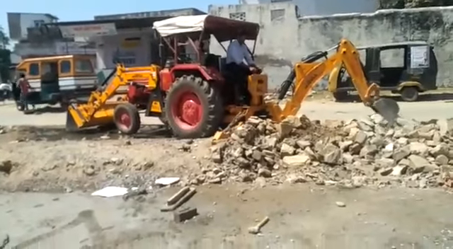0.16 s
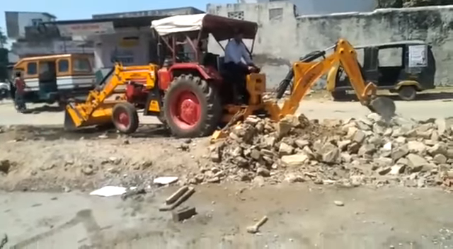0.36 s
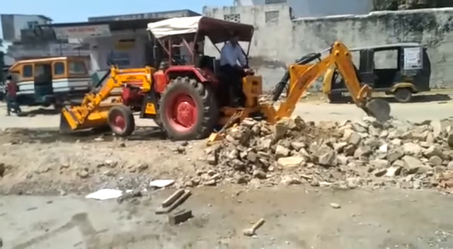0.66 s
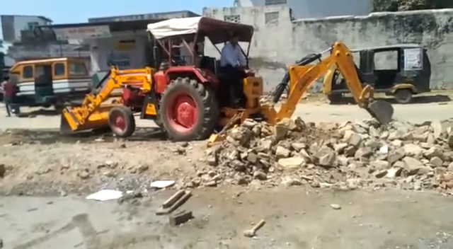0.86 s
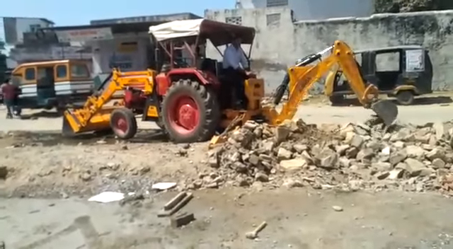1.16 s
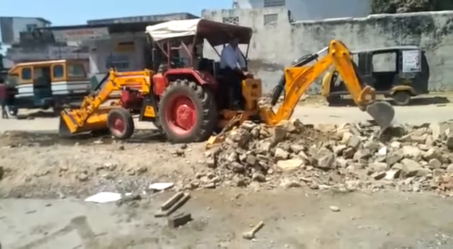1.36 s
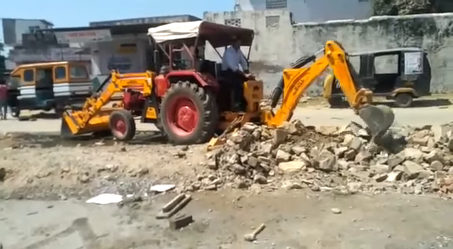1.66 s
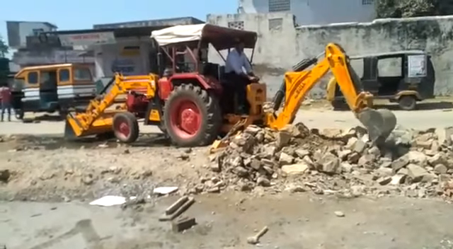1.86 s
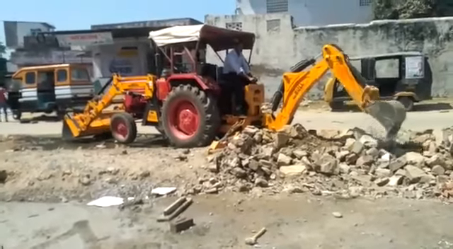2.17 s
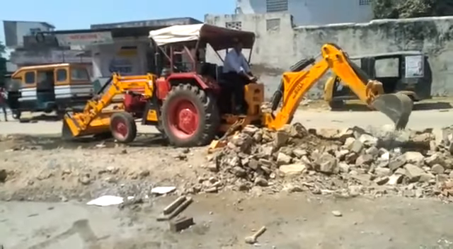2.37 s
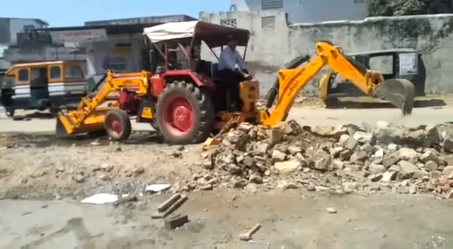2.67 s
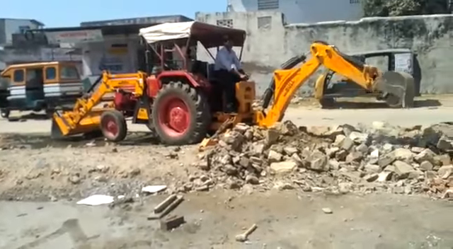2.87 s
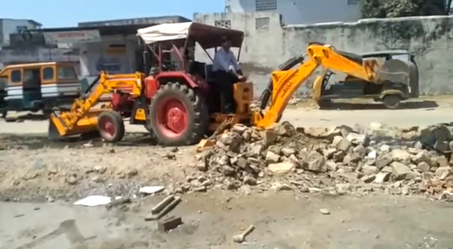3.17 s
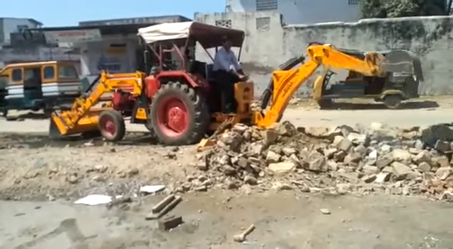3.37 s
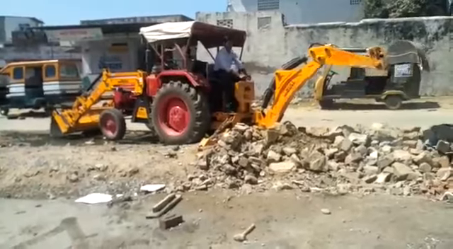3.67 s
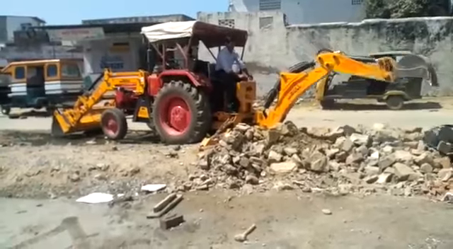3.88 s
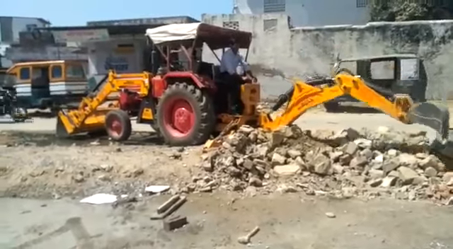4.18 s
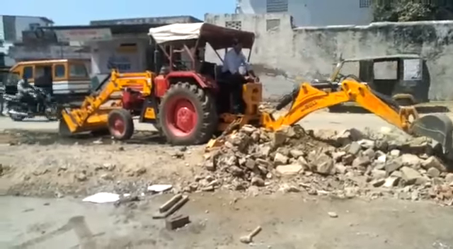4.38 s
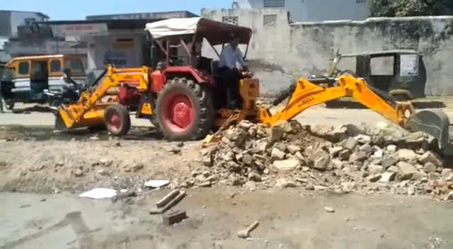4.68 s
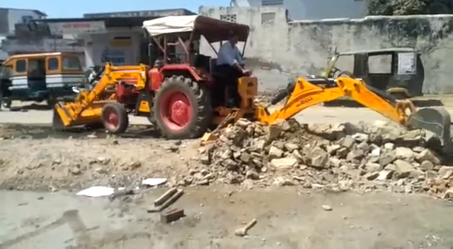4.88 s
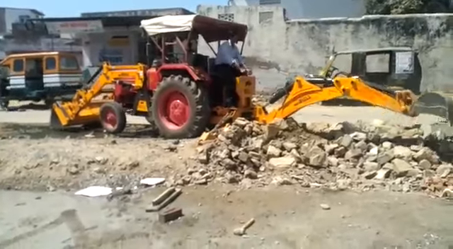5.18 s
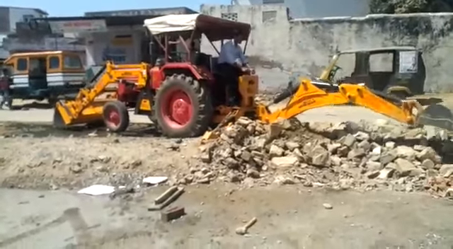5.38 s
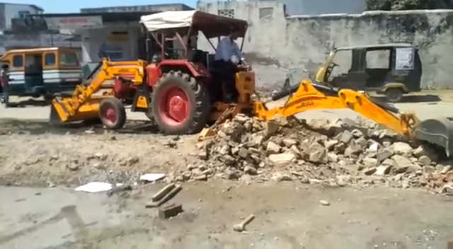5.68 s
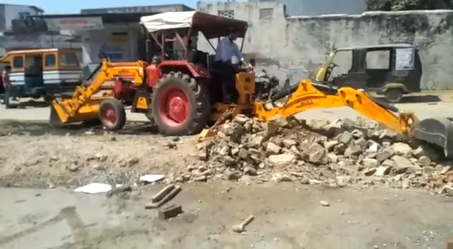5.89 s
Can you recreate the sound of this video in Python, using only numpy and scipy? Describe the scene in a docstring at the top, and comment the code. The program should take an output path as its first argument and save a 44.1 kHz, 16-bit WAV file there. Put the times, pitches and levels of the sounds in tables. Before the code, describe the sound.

Steady diesel clatter, with sharp stone cracks and metallic bucket clanks, a brief high valve hiss, then a last crumble of dry rubble.

```python
"""A diesel tractor runs at a nearly steady speed while its backhoe bucket works broken brick and stone.
First come a few bumps and light cracks, then harder blows near 2 s, a short valve hiss at 3.6 s,
the hardest crack at 4.4 s and a last crumbling run before 6 s. Engine: sine tones and pulsing noise.
Stones: bursts of grainy noise with wobbling notes for the lumps. Bucket: resonances struck by the blows.
Hard blows make the gain control turn everything down, so the engine drops away and slowly swells back."""
import sys
import numpy as np
from scipy import signal
from scipy.fft import rfft, irfft, next_fast_len
from scipy.io import wavfile

SR = 44100
rng = np.random.default_rng(int(sys.argv[2]) if len(sys.argv) > 2 else 0)


def output_pcm(signal):
    """Save a mono or channel-first signal as 16-bit PCM at the path in sys.argv[1].

    Samples are clipped to [-1, 1] before scaling.
    """
    pcm = np.clip(np.atleast_2d(signal).T, -1, 1) * 32767
    wavfile.write(sys.argv[1], SR, np.round(pcm).astype(np.int16))


N = 266805
TIME = np.arange(N) / SR


def from_db(db):
    """Turn decibels into a gain."""
    return 10 ** (np.asarray(db) / 20)


def rms_one(x):
    """Scale a sound to an rms (average strength) of 1."""
    return x / np.sqrt(np.mean(x ** 2) + 1e-20)


def in_time(rows):
    """Read a (time [s], value) curve at every sample."""
    times, values = np.transpose(rows)
    return np.interp(TIME, times, values)


def at_hz(points, hz):
    """Read a (frequency [Hz], value) curve on a log-frequency axis."""
    frequencies, values = np.transpose(points)
    return np.interp(np.log(hz), np.log(frequencies), values)


def coloured(x, spectrum):
    """Filter a sound by a (frequency [Hz], level [dB]) curve and scale it to rms 1."""
    size = next_fast_len(len(x))
    frequencies = np.fft.rfftfreq(size, 1 / SR) + 1   # the 1 avoids log(0)
    gain = from_db(at_hz(spectrum, frequencies))
    return rms_one(irfft(rfft(x, size) * gain, size)[:len(x)])


def drift(rate, size=N):
    """Smooth random wandering of rms 1, with `rate` new values per second."""
    knots = rng.standard_normal(int(size / SR * rate) + 3)
    position = np.arange(size) / SR * rate
    return rms_one(np.interp(position, np.arange(len(knots)), knots))


def resonate(x, hz, width_hz):
    """Ring at one frequency: a two-pole resonance with gain 1 at its peak."""
    r = np.exp(-np.pi * width_hz / SR)
    feedforward = np.array([1, 0, -1]) * (1 - r * r) / 2
    feedback = [1, -2 * r * np.cos(2 * np.pi * hz / SR), r * r]
    return signal.lfilter(feedforward, feedback, x + 1e-18)


def swell_and_die(t, rise, t60):
    """Loudness of a blow: it rises over `rise` seconds and decays by 60 dB in `t60` seconds."""
    return (1 - np.exp(-t / rise)) * np.exp(-np.log(1000) * t / t60)


def add(out, start_s, sound):
    """Mix a sound in at a given time."""
    at = round(start_s * SR)
    out[at:at + len(sound)] += sound[:N - at]


def cylinder_knock(crank, rise=0.00059, t60=0.099):
    """Four cylinders fire in turn, each with a noisy knock of its own that repeats every cycle."""
    half_turns = np.floor(crank / np.pi).astype(int)
    firings = np.flatnonzero(np.diff(half_turns)) + 1
    t, out = TIME[:SR // 12], np.zeros(N)
    for cylinder in range(4):
        own = firings[cylinder::4]
        clicks = np.zeros(N)
        clicks[own] = from_db(2 * rng.standard_normal(len(own)))   # uneven strength
        knock = rng.standard_normal(len(t)) * swell_and_die(t, rise, t60)
        out += signal.oaconvolve(clicks, knock)[:N]
    return rms_one(out)


def exhaust(crank, waver_db=1.0, slip=0.12):
    """The exhaust hums at multiples of the crank rate; each tone wavers in strength and timing."""
    # exhaust note: (multiple of the crank rate, relative level [dB])
    exhaust_orders = [(1, -34), (2, -10.5), (3, -31), (4, 0.5), (5, -12.5), (6, -9), (7, -15), (8, -11.5),
                      (9, -23.5), (10, -14), (11, -26), (12, -17)]
    hum = np.zeros(N)
    for k, db in exhaust_orders:
        phase = k * crank + rng.uniform(0, 2 * np.pi) + slip * np.sqrt(k) * drift(22)
        hum += from_db(db + waver_db * drift(20)) * np.sin(phase)
    return rms_one(hum)


def clatter(crank):
    """Cylinder knock over the even rush of fan and gears gives a broad clatter."""
    # clatter spectrum: (frequency [Hz], relative level per Hz [dB])
    clatter_spectrum = [(30, -22), (45, -4), (65, 2.5), (120, -3), (200, -0.5), (310, -0.5), (550, -14.5),
                        (760, -5), (1150, -13), (2000, -14), (4000, -17.5), (9500, -26.5), (12000, -20),
                        (15500, -24)]
    shake = 0.6 * cylinder_knock(crank) + rng.standard_normal(N)
    return coloured(shake, clatter_spectrum)


def block_ringing(crank, panel_db=3.0):
    """Knock and rush set the engine block and panels ringing, with a wandering strength."""
    # ringing of block and panels: (frequency [Hz], width [Hz], relative level [dB])
    block_modes = [(818.5, 21, -5), (959, 77, 1), (1415, 250, 0.5), (2230, 200, -4.5), (3090, 260, -4.5)]
    shake = cylinder_knock(crank) + rng.standard_normal(N)
    ringing = np.zeros(N)
    for hz, width_hz, db in block_modes:
        ringing += from_db(db + panel_db * drift(20)) * rms_one(resonate(shake, hz, width_hz))
    return rms_one(ringing)


def engine(exhaust_db=-37.5, clatter_db=-38.5, block_db=-4):
    """Two firings a turn drive low exhaust tones, a pulsing clatter and the ringing block."""
    # governed engine speed: (time [s], crank turns per second [1/s])
    speed = [(0, 24.8), (.85, 24.9), (1.15, 24.55), (1.9, 24.9), (2.4, 24.65), (3.05, 24.95), (3.5, 24.6),
             (4.3, 24.75), (6.05, 24.7)]
    # level of the engine over time: (time [s], level [dB])
    engine_level = [(0, -1.5), (0.55, -0.4), (0.88, -2.5), (1.15, 3.5), (3.0, 4.5), (4.35, 5.5), (5.45, 5),
                    (6.05, 0)]
    crank = 2 * np.pi * np.cumsum(in_time(speed)) / SR
    mechanical = clatter(crank) + from_db(block_db) * block_ringing(crank)   # block level is against the clatter
    running = from_db(exhaust_db) * exhaust(crank) + from_db(clatter_db) * mechanical
    return from_db(in_time(engine_level)) * running


def valve(opens_s=3.554, start_db=-14.5, fall_db_per_s=100, flutter_db=1.5):
    """A short, very high hiss as the boom changes direction: the valve opens, the pressure falls, it shuts."""
    # oil squeezing through the valve: (frequency [Hz], relative level per Hz [dB])
    hiss_spectrum = [(1000, -16), (1500, -4.5), (2100, -3), (2700, -18.5), (5500, -19), (9000, -22.5),
                     (11700, -16), (12300, 3), (14000, 0.5), (15500, -7.5)]
    attack_s, hold_s, release_s = 0.023, 0.12, 0.047
    t = TIME - opens_s
    opening = np.interp(t, np.cumsum([0, attack_s, hold_s, release_s]), [0, 1, 1, 0])
    level_db = start_db - fall_db_per_s * np.maximum(t - attack_s, 0)
    hiss = coloured(rng.standard_normal(N), hiss_spectrum)
    return opening * from_db(level_db + flutter_db * drift(100)) * hiss


def yard(x, wet_db=-23, rise=0.054, t60=0.31):
    """Walls and the heap scatter the sound into a short, thin tail."""
    # tail of the yard: (frequency [Hz], relative level [dB])
    tail_spectrum = [(100, 8), (600, 5), (2000, 0.5), (4300, -2), (5700, 6), (8000, 5), (13000, -10)]
    t = TIME[:SR]
    tail = coloured(rng.standard_normal(len(t)), tail_spectrum) * swell_and_die(t, rise, t60)
    return x + from_db(wet_db) * signal.fftconvolve(x, tail / np.linalg.norm(tail))[:N]


def bumps(push_s=0.00153):
    """The bucket bumps the heap: each force is one smooth push, soft enough to stir mainly low notes."""
    # bumps against the heap: (time [s], level of the push [dB])
    bump_table = [(0.378, 4.5), (1.031, 10.5), (1.147, 13), (1.214, 27), (1.272, 20), (1.634, 10)]
    out, t = np.zeros(N), TIME[:SR // 100]
    push = np.sin(np.pi * np.minimum(t / push_s, 1)) ** 2
    for start_s, db in bump_table:
        add(out, start_s, from_db(db) * push)
    return out


def bucket(force, ring_db=-3, chatter_db=3.0, chatter_s=0.00015):
    """Blows set the steel ringing; the rubble damps it and makes it chatter in strength and timing."""
    # notes of the steel bucket: (frequency [Hz], relative level [dB], time to decay by 60 dB [s])
    steel_modes = [(612, -4.5, 0.29), (773, -14, 0.091), (1098, -20.5, 0.29), (1650, -7, 0.071),
                   (2140, -8, 0.13), (2257, 7, 0.11), (2886, 4, 0.11), (3065, -4, 0.038), (3960, -6, 0.081),
                   (5157, -29.5, 0.19), (8576, -24, 0.09), (9986, -21, 0.15)]
    ring = np.zeros(N)
    for hz, db, t60 in steel_modes:
        width_hz = np.log(1000) / (np.pi * t60)   # a quick decay means a wide resonance
        ring += from_db(db) * resonate(force, hz, width_hz)
    level = from_db(ring_db + chatter_db * drift(89.95))
    return level * np.interp(TIME + chatter_s * drift(110), TIME, ring)


def contacts():
    """List every touch of the bucket on stone, hard or quiet, with the same eight columns."""
    # the bucket breaks a stone and knocks a lump loose: (time [s], level [dB], rise [s],
    # crumbling time to decay by 60 dB [s], weight in the low mids [dB], dust in the treble [dB],
    # note of the lump [Hz], level of the note against the blow [dB])
    blow_table = [ (0.930, -18, 0.0054, 0.19, -1.5, -3, 768, 4.5), (0.946, -25.5, .003, .19, 4, 8, 901, 15),
                  (0.999, -31, .004, 0.22, 16, 4, 596, 12.5),
                  (1.203, -9.5, 0.0084, 0.11, 13.5, 1, 606, -2.5),
                  (1.941, 4, 0.0019, 0.14, 0, -2.5, 856, -3),
                  (1.970, -2.5, .0012, .12, 4, -20, 356.3, -1.5),
                  (2.137, -8.5, 0.006, 0.16, 6.5, -2, 864, 5), (2.178, -10.5, 0.0036, 0.14, 5, -2, 1384, 0),
                  (2.191, -4.5, .0012, 0.047, -13.5, -6, 875, -6),
                  (4.401, 6, 0.004, .15, 5.5, 1.5, 262.4, -4), (4.442, -6, .0008, 0.1, 17, -10, 973, 5),
                  (5.625, -7.5, 0.012, .2, 10.5, 3.5, 1248, 4.5),
                  (5.660, -15.5, 0.0037, 0.18, 14, 4, 211, 6), (5.682, -11, .0011, 0.21, 8, 14.5, 337, 9),
                  (5.754, -19.5, .0007, 0.11, 16, 14, 593, 12.5)]
    # quieter touches of the bucket on stone: (time [s], level [dB], note of the lump [Hz])
    touch_table = [(1.194, -27.5, 606), (1.633, -37.5, 355), (1.690, -38.5, 370), (1.836, -34, 1400),
                   (1.909, -34, 894), (2.398, -27, 1387), (3.857, -33.5, 304), (3.947, -30, 370),
                   (4.507, -22, 332), (5.345, -32.5, 830), (5.477, -28.5, 883), (5.801, -33, 425)]
    # the quieter touches share one rise, decay and colour
    rise, t60, weight_db, dust_db, note_db = 0.003, 0.17, 17, 0, 6
    touches = [(start_s, db, rise, t60, weight_db, dust_db, hz, note_db) for start_s, db, hz in touch_table]
    return list(blow_table) + touches


def knocks(rise=0.0016, t60=0.14, rattle=0.64, rattle_db=3.0):
    """A lump rings briefly with two notes and rocks against its neighbours, which roughens them."""
    out, t = np.zeros(N), TIME[:SR // 2]
    for start_s, db, *_, hz, note_db in contacts():
        for ratio, mode_db in ((1, 0), (1.56, -10)):   # main note and overtone [dB]
            note = np.sin(2 * np.pi * hz * ratio * t + rattle * drift(199, size=len(t)))
            level_db = db + note_db + mode_db + rattle_db * drift(195, size=len(t))
            add(out, start_s, note * from_db(level_db) * swell_and_die(t, rise, t60))
    return out


def colour_db(hz, weight_db, dust_db, dust_hz=8200):
    """The weight of a stone shapes the thud and clank; its dry dust shapes the treble above dust_hz."""
    # where a heavy stone adds its weight: (frequency [Hz], share of the weight [ratio])
    weight_share = [(270, 0.94), (750, 0.8), (1900, 1.01), (4200, 0.13)]
    return weight_db * at_hz(weight_share, hz) + dust_db / (1 + (dust_hz / hz) ** 4)


def fracture_bands():
    """Split the range from 110 Hz to 16 kHz into filters, each with its middle frequency."""
    edges = np.geomspace(110, 16000, 19)
    bands = []
    for low, high in zip(edges, edges[1:]):
        bands.append((signal.butter(2, (low, high), "band", fs=SR, output="sos"), np.sqrt(low * high)))
    return bands


def fracture_noise(size, grain_db=2.0, lumpy_db=1.5, stone_db=3.0):
    """Two grainy noises of one stone, which has its own uneven spectrum."""
    stone_hz = np.geomspace(900, 15000, 160)
    stone = list(zip(stone_hz, stone_db * rng.standard_normal(len(stone_hz))))
    grains = from_db(grain_db * drift(2500, size=size) + lumpy_db * drift(200, size=size))
    return [coloured(rng.standard_normal(size) * grains, stone) for _ in range(2)]


def blows(grit_s=0.049, grit_grain_db=1.0, grit_db=-22, grit_per_dust=0.36):
    """Each contact is a grainy burst that fades as the stone crumbles; grit trickles after it."""
    # crunch shared by all contacts: (frequency [Hz], relative level per Hz [dB])
    crunch_spectrum = [(100, -19), (170, -10.5), (280, -0.5), (480, -2.5), (820, 4.5), (1080, -0.5),
                       (1320, 2.5), (1900, -1.5), (3400, 2.5), (4700, 2.5), (7000, 0.5), (8500, -6.5),
                       (12500, -5.5), (15500, -8)]
    # trickling grit: (frequency [Hz], relative level per Hz [dB])
    grit_spectrum = [(300, -13), (700, -1), (2000, -3), (4500, -13), (5700, 10), (8500, -4.5), (12000, 9),
                     (15500, -1)]
    out, t = np.zeros(N), TIME[:SR // 4]
    head = round(0.03 * SR)   # the first 30 ms set the level of a burst
    bands = fracture_bands()
    # loosened grit slides for a moment and comes to rest
    trickle = t / grit_s * np.exp(0.5 - 0.5 * (t / grit_s) ** 2)
    for start_s, db, rise, t60, weight_db, dust_db, *_ in contacts():
        fractures = fracture_noise(len(t))
        envelope = swell_and_die(t, rise, t60)
        burst = np.zeros(len(t))
        for k, (band_filter, hz) in enumerate(bands):
            band_db = at_hz(crunch_spectrum, hz) + colour_db(hz, weight_db, dust_db)
            # neighbouring bands take turns with the two noises
            band = rms_one(signal.sosfilt(band_filter, fractures[k % 2]) * envelope)
            burst += np.sqrt(hz) * from_db(band_db) * band   # wider bands carry more energy
        burst /= np.std(burst[:head])
        grains = from_db(grit_grain_db * drift(1300, size=len(t)))
        grit = coloured(rng.standard_normal(len(t)) * grains, grit_spectrum)
        grit_level = from_db(grit_db + grit_per_dust * dust_db)   # dusty stones shed more
        add(out, start_s, from_db(db) * (burst + grit_level * grit * trickle))
    return out


def scene():
    """Engine, hydraulics and digging, with the tail of the yard on the digging."""
    crunch = blows()
    digging = crunch + bucket(crunch + bumps()) + knocks()
    return (engine() + valve() + yard(digging))[None]


def gain_control(x, limit_db=-21.0, share=0.87, recover_db_per_s=6.5, window_s=0.018, ahead_s=0.0039):
    """The gain drops by most of the excess once the short-term level passes the limit, then creeps back."""
    size = int(window_s * SR)
    ahead = int(ahead_s * SR)   # the level is read slightly early
    power = signal.fftconvolve(x[0] ** 2, np.ones(size) / size)[ahead:][:N]
    excess_db = np.maximum(10 * np.log10(np.abs(power) + 1e-12) - limit_db, 0)
    cut_db = share * excess_db
    recovered_db = recover_db_per_s * TIME
    # the deepest cut so far holds, less what has crept back since
    return x * from_db(recovered_db - np.maximum.accumulate(cut_db + recovered_db))


def record(dry):
    """Gain control, softly rounded peaks and a steep top cut."""
    rounded = np.tanh(gain_control(dry))
    top_cut = signal.ellip(12, 0.2, 80, 15200, fs=SR, output="sos")   # cutoff 15200 Hz
    return signal.sosfilt(top_cut, rounded)


dry = scene()
out = record(dry)
output_pcm(out)
```